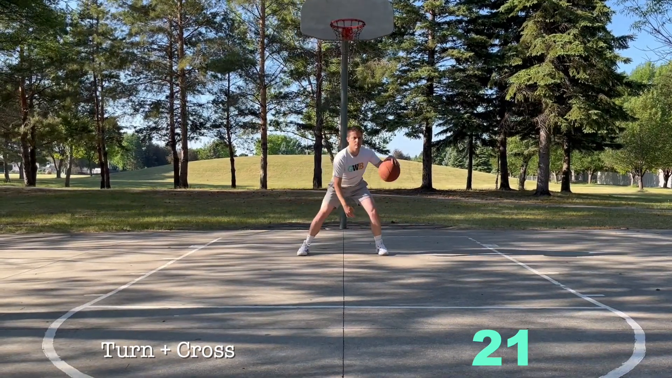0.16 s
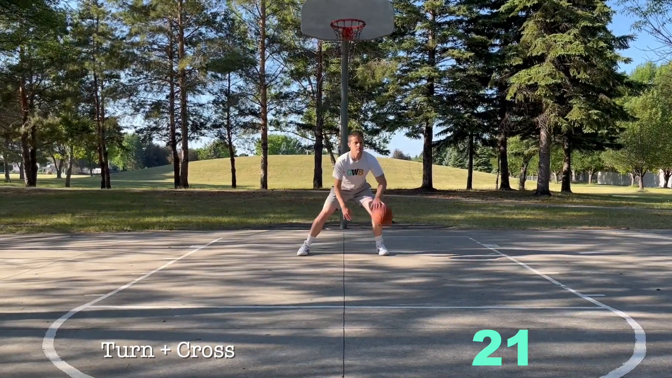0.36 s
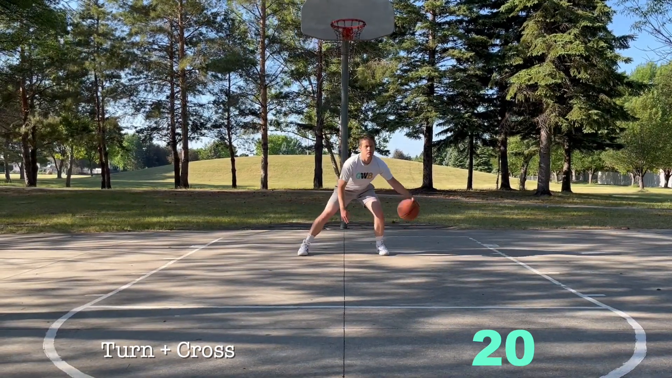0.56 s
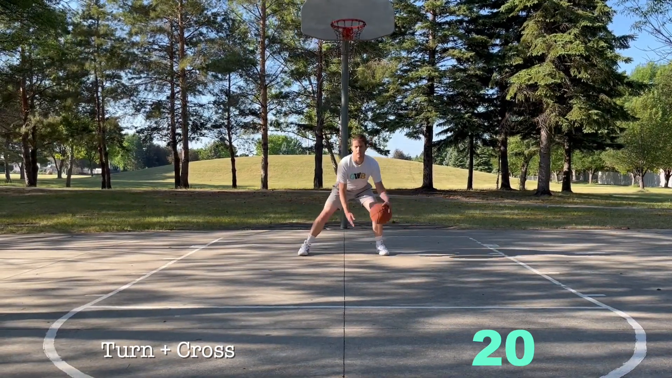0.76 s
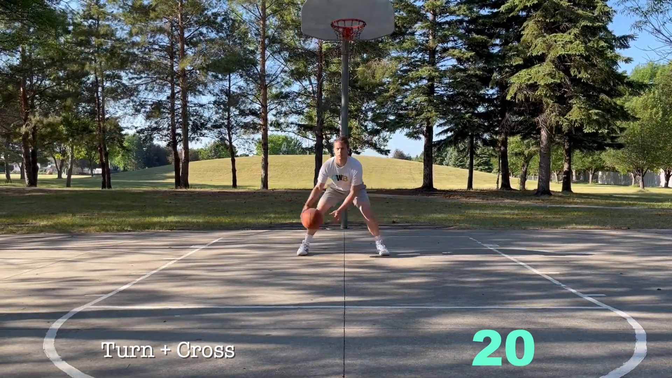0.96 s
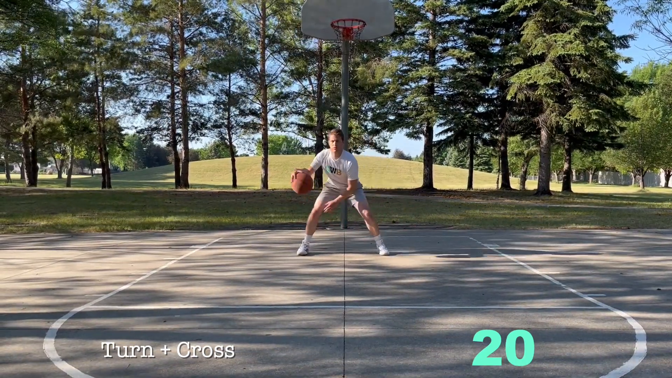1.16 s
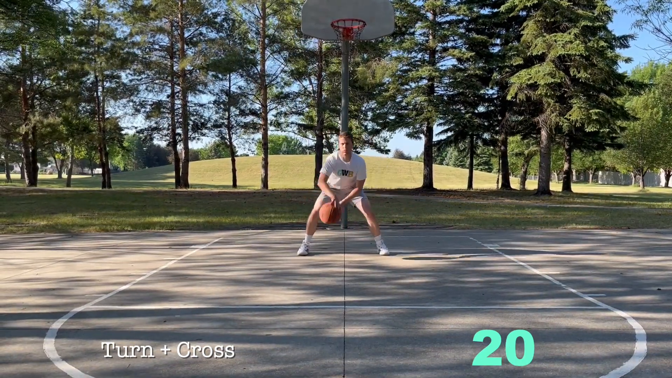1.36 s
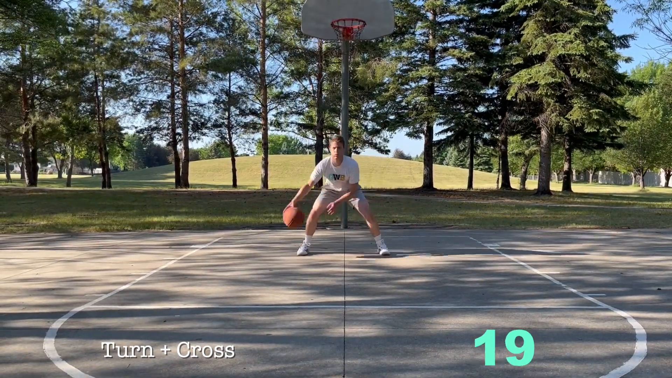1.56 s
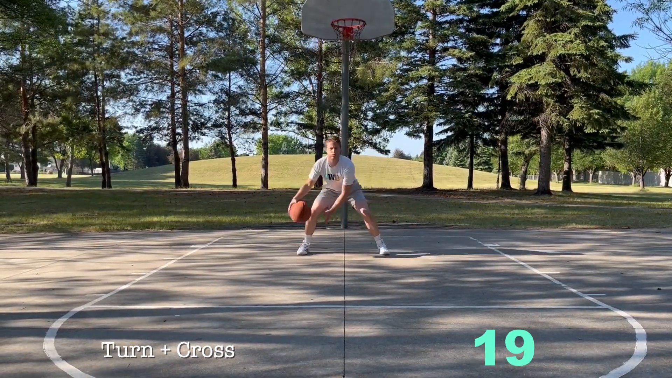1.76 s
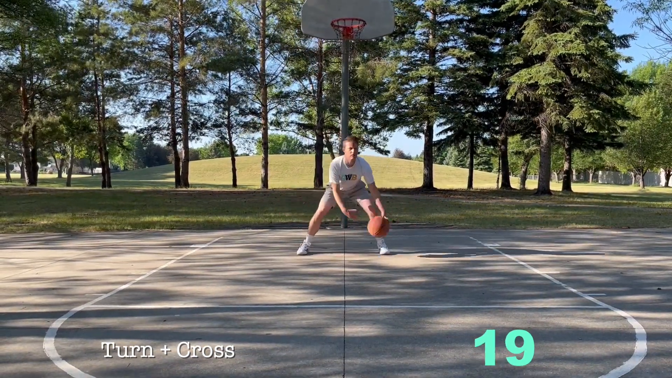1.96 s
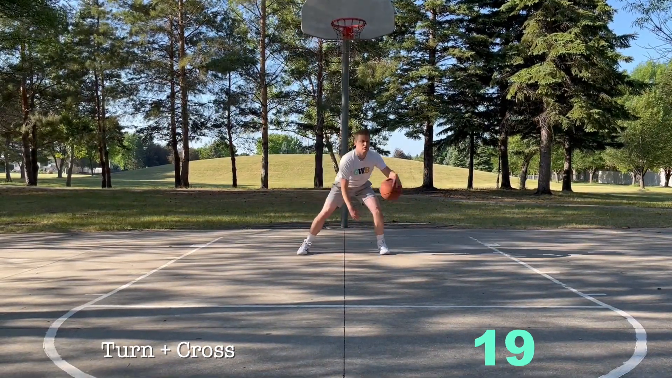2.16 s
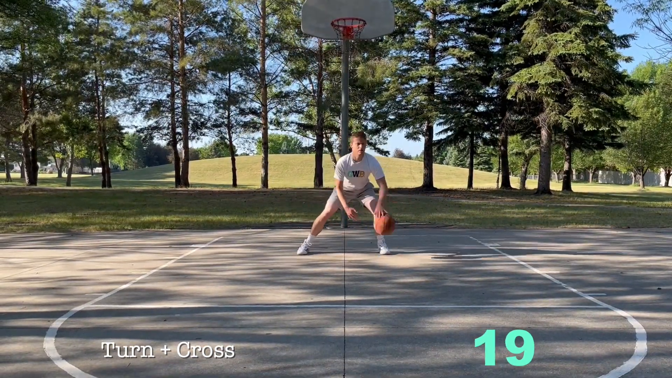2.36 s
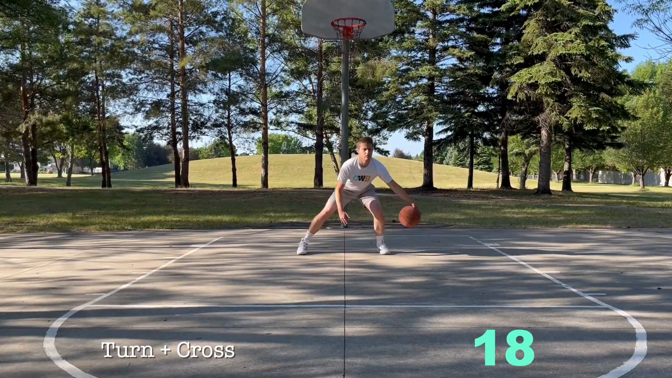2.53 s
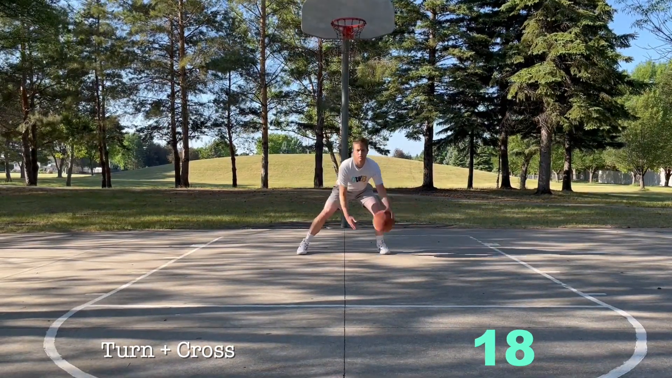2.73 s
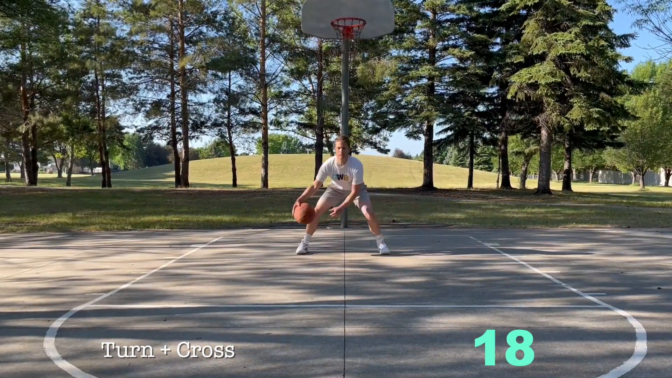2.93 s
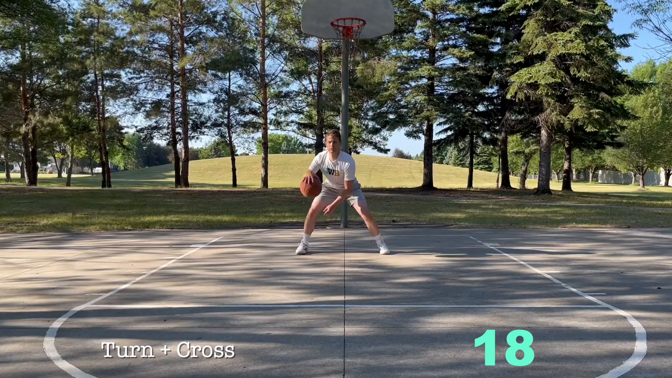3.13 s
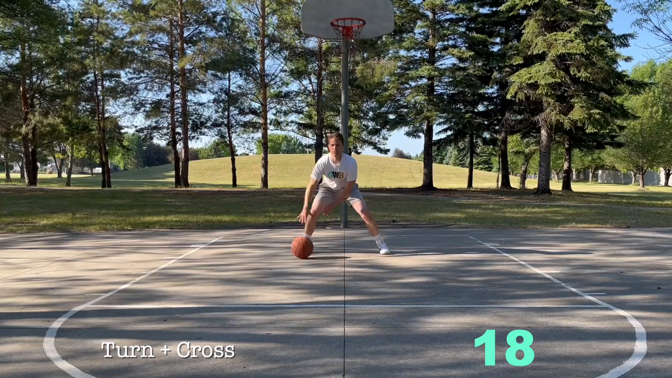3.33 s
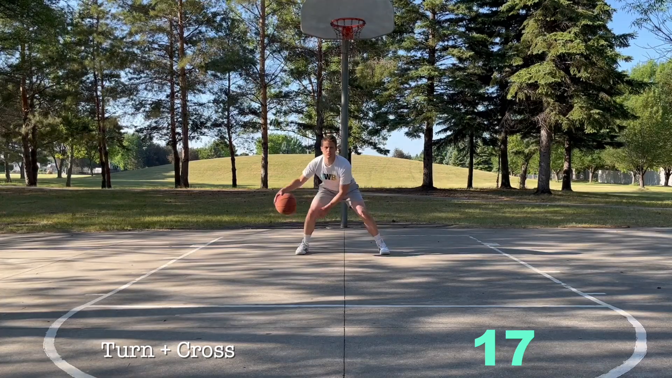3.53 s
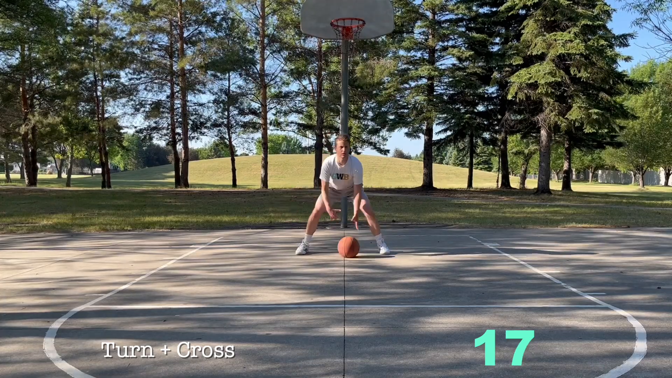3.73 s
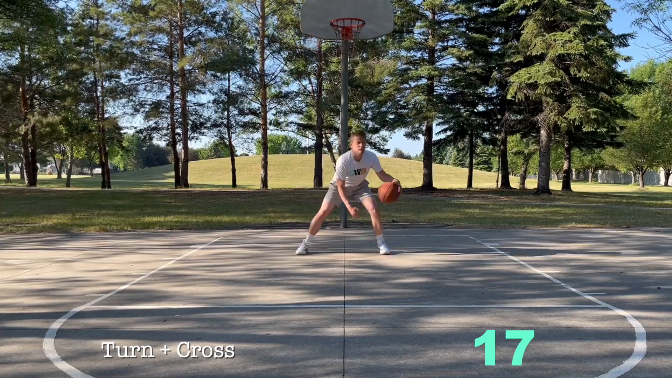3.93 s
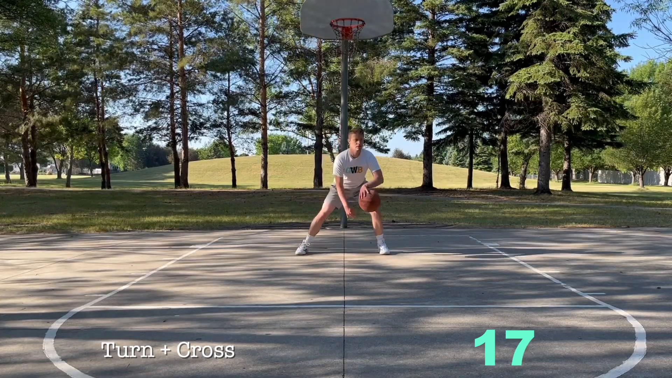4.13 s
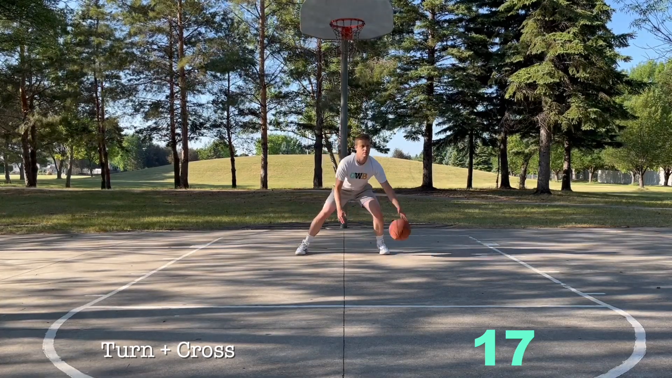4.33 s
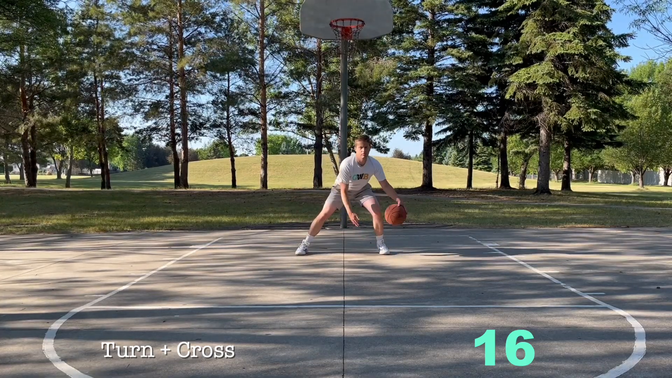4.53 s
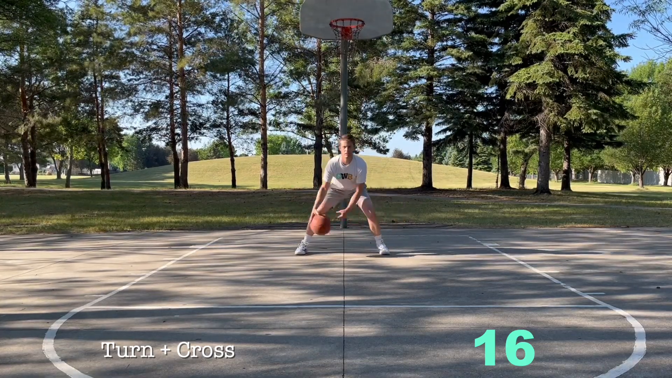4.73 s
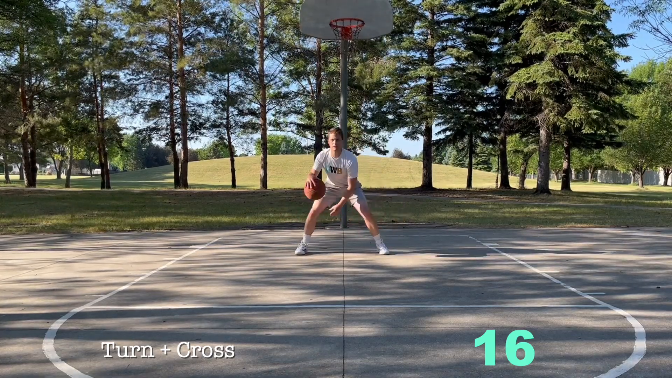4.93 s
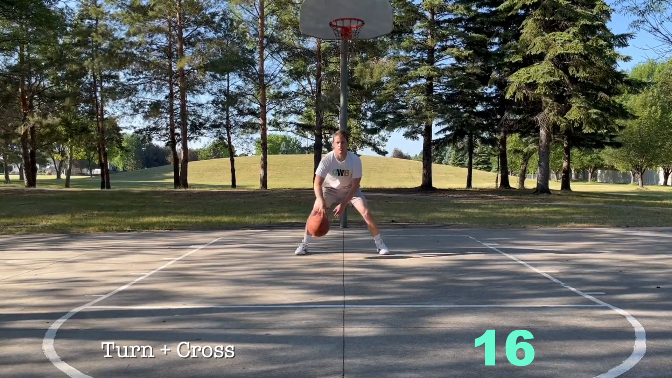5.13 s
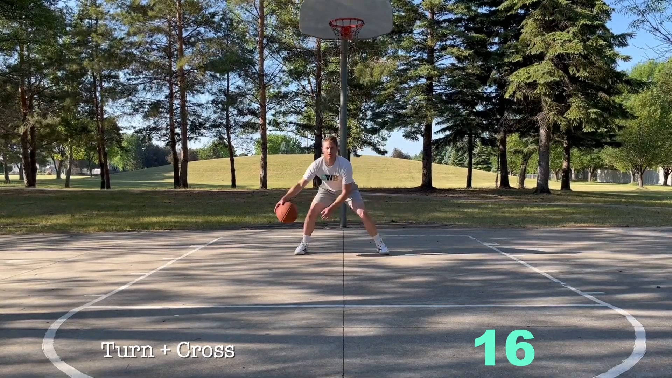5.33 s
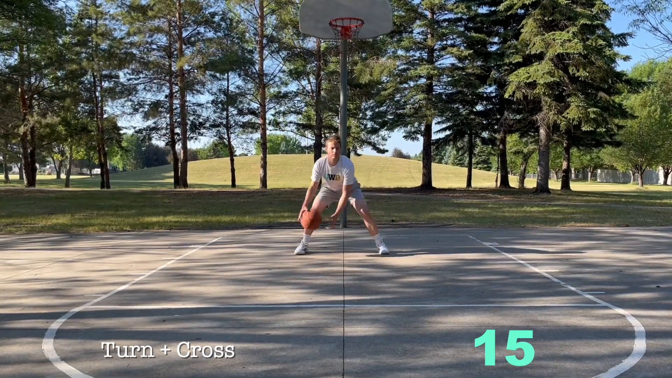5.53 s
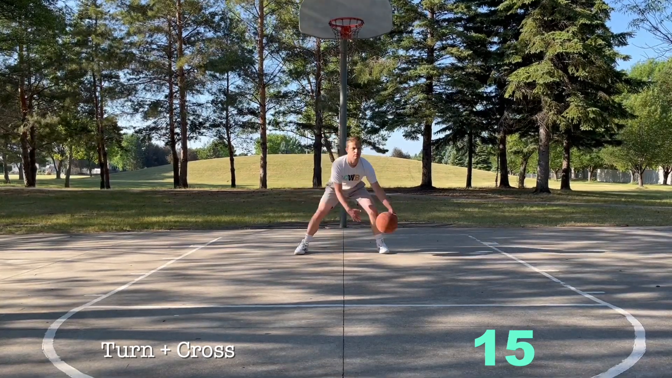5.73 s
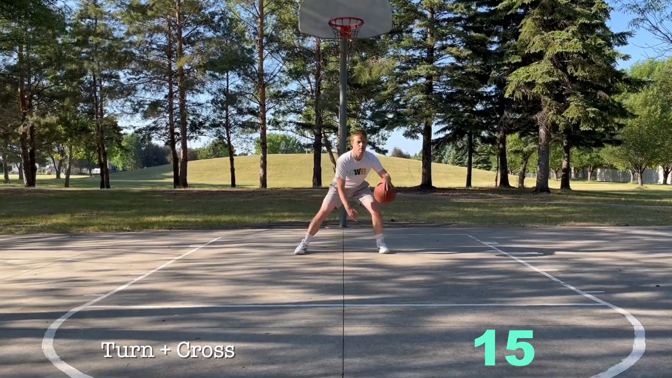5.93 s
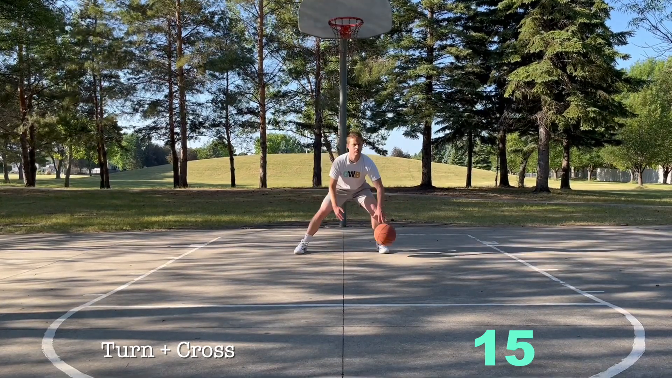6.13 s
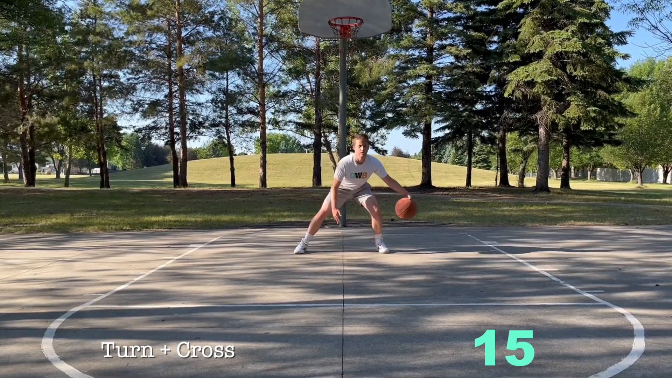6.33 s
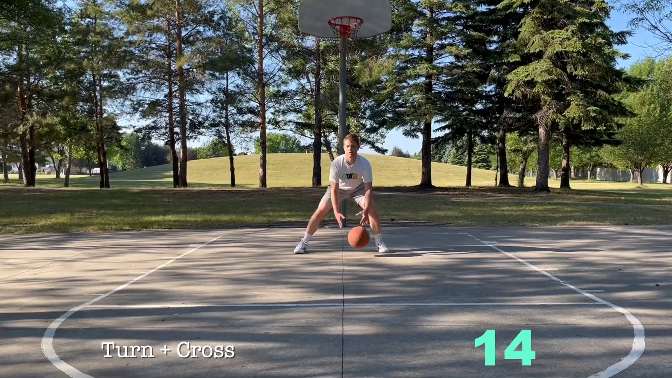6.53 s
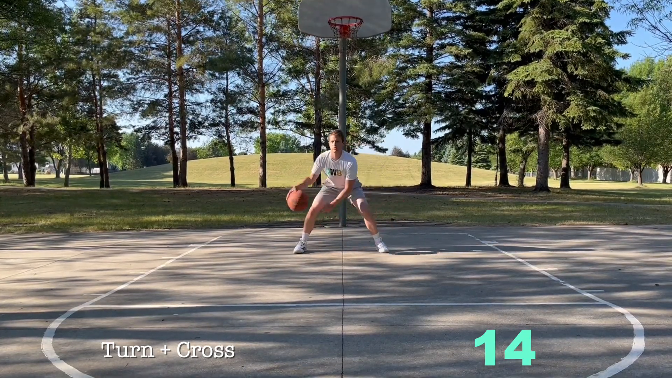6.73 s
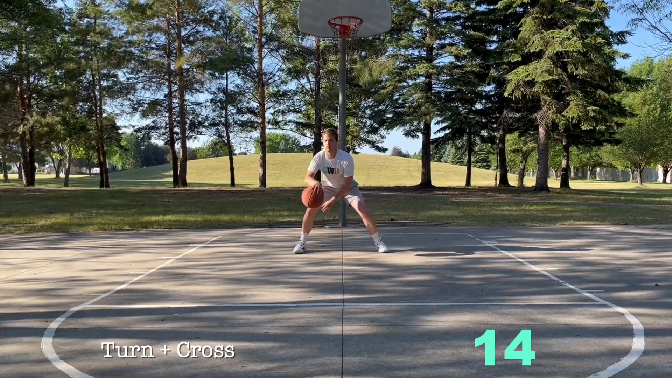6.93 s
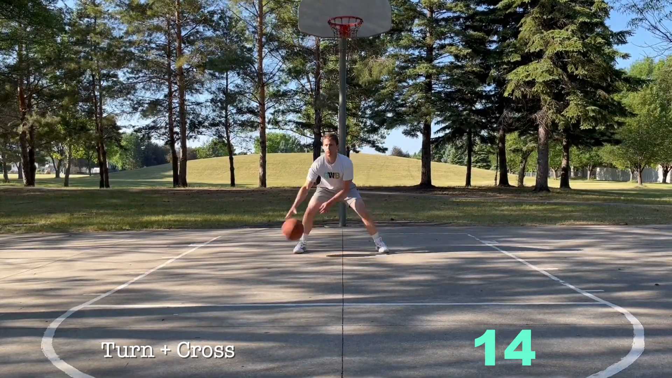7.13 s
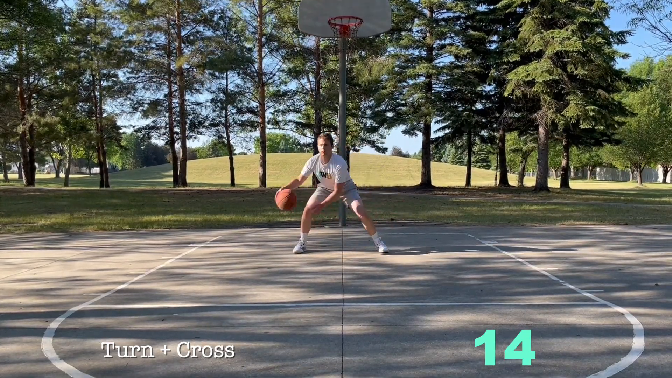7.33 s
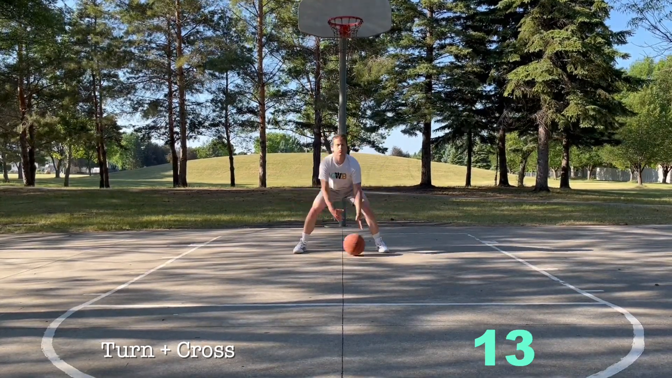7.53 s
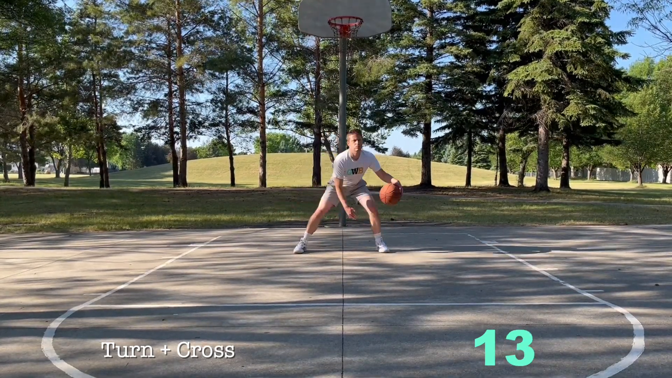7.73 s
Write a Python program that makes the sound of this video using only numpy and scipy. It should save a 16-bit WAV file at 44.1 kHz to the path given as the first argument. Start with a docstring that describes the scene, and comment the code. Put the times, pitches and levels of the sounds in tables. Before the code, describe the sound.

A single basketball is pounded on an outdoor concrete court a few metres from the microphone. Each bounce is a bright, gritty slap with a short hollow rubber ping and low thump, then a faint echo from the backboard and trees. Bounces come roughly twice a second, alternating shorter and longer gaps. Wind rumbles and pops on the microphone, strongest midway, over a soft steady hiss of leaves.

```python
"""Outdoor court on a breezy day: a basketball is dribbled hard a few metres from the microphone.
Each bounce sums a slap pulse on concrete, crushed grit, the ringing shell, a low thump and a lift-off.
The backboard and trees answer by convolution with a faint echo and decaying noise.
Leaves hiss as steady coloured noise; wind is rumble, flutter and single pops on the microphone."""
import sys
import numpy as np
from scipy import signal
from scipy.fft import rfft, irfft, next_fast_len
from scipy.io import wavfile
from scipy.ndimage import map_coordinates

SR = 44100
rng = np.random.default_rng(int(sys.argv[2]) if len(sys.argv) > 2 else 0)


def store_wav(level_fs):
    """Save 16-bit WAV to argv[1]."""
    pcm = np.round(np.clip(np.atleast_2d(level_fs), -1, 1) * 32767)
    wavfile.write(sys.argv[1], SR, pcm.T.astype(np.int16))


N = 347508

# Bounces; levels are before each layer's trim: (time [s], slap level [dB], slap centre [Hz],
#  panel resonance over slap [dB], panel pitch [Hz], panel width [Hz], crack: slap treble boost [dB],
#  grit level [dB], shiver over slap [dB], ping level [dB], ping pitch [Hz], ping t60 [s],
#  ping over other modes [dB], lift-off level [dB], thump level [dB])
BOUNCES = [(0.4866, -21.5, 2780, 5, 2800, 520, 3.5, -30, -12, -30, 970, 0.024, -1.5, -44, -26),
           (0.906, -20, 2370, 2, 2060, 330, 0, -24, -10.5, -35, 790, .022, 0, -39.5, -21),
           (1.5017, -22.5, 2520, -8, 3400, 650, 3, -46, -12, -29, 983, 0.024, -0.5, -34.5, -21),
           (1.93, -26, 2600, -16, 3500, 1800, 0, -31, -7.5, -41, 1030, .018, 1, -45, -29.5),
           (2.469, -20, 2750, 3, 3230, 650, 3.5, -32, -14.5, -22.5, 1072, 0.029, 10.5, -39, -20),
           (2.8529, -23, 1950, -3, 2400, 900, -1, -53, -9.5, -32, 920, 0.024, 1, -36, -20),
           (3.377, -25.5, 2300, 15, 5900, 1500, 5, -14.5, -7, -24.5, 1005, 0.02, -2, -31.5, -17),
           (3.7668, -20, 2350, -2, 2770, 1100, -11, -59, -10.5, -27, 1226, 0.016, 6.5, -32.5, -18.5),
           (4.3137, -27, 2820, 21, 3440, 650, 10, -38, -7.5, -26, 1068, 0.033, 2.5, -34.5, -21),
           (4.6891, -20, 2650, -3, 3370, 650, -21, -24, -4, -41, 980, 0.039, 1, -37.5, -19.5),
           (5.2349, -23.5, 3150, 1, 3360, 650, 4.5, -25.5, -6, -30.5, 1096, 0.021, -1, -48, -42),
           (5.6738, -21.5, 2260, 2, 2420, 800, 0, -40, -6.5, -30.5, 1070, .022, -2.5, -40.5, -38.5),
           (6.208, -21, 2680, 8, 3300, 1200, 3.5, -32, -19, -25, 1050, 0.01, 9.5, -42.5, -35),
           (6.5996, -24, 2030, 7, 3240, 650, -5, -36, -6, -22.5, 1100, 0.013, 3.5, -36.5, -22.5),
           (7.1191, -23, 2480, 14, 3230, 650, 2, -34, -7.5, -23.5, 985, 0.018, 0.5, -27, -32),
           (7.5622, -26, 2250, 8, 5100, 2420, -12, -24, -6, -27, 974, 0.031, -2.5, -32, -35)]
# Ball modes with the ping at PING_HZ: (pitch [Hz], level [dB], t60 [s])
BALL_MODES = [(376, -17, 0.128), (454, -30, 0.084), (687, -7.5, 0.051), (866, -0.5, 0.038),
              (1118, 8.5, 0.019), (1302, -3.5, 0.05), (1720, -3.5, 0.021), (1885, -5.5, 0.042),
              (2260, -31, 0.04), (2660, -8.5, .022)]
PING_HZ = 1070
# Spectra of the contact layers: (frequency [Hz], relative density [dB])
SLAP_SPECTRUM = [(60, -35), (400, -3.5), (900, -5), (1500, 3), (2000, 11), (3100, 5.5), (4200, 2),
                 (6000, -11), (10000, -8), (13000, -18.5), (16000, -50)]
GRIT_SPECTRUM = [(1500, -25), (3200, -9), (4200, 0), (5200, 2), (6700, 1), (7600, -7), (9000, -19),
                 (11000, -28), (16000, -48)]
SHELL_SPECTRUM = [(40, -40), (120, -10), (250, -4), (450, 3.5), (750, 3), (1150, 8.5), (1500, -14.5),
                  (2200, -2), (3200, -2.5), (5000, -15), (9000, -22), (16000, -51)]
# Rubber peeling off concrete: (frequency [Hz], relative density [dB])
SCUFF_SPECTRUM = [(300, -12), (1000, 1), (1600, 4), (2600, -8), (4200, -14.5), (7000, -25), (16000, -50)]
# Rough part of the thump: (frequency [Hz], relative density [dB])
THUD_SPECTRUM = [(70, -66), (140, 5.5), (200, 4.5), (280, -7.5), (370, -2), (520, -9.5), (800, -16.5),
                 (2000, -21.5), (12000, -61.5), (16000, -82)]
# Air inside the ball: (pitch [Hz], level over slap [dB], t60 [s])
AIR_MODES = [(985, -32, 0.24), (2130, -44, 1.7), (2780, -48, .35)]
CRACK_HZ = 7500  # corner of the slap's treble boost
BUCKLE_S, BUCKLE_HZ, BUCKLE_DB = 0.00548, 260, -6.5  # delay, mean pitch, level over shell motion
# Stereo width of the ball: (frequency [Hz], side over mid [dB])
BALL_WIDTH = [(100, -14.5), (600, -21), (1100, -15.5), (1550, -6), (2000, -16), (2900, -7), (5000, -9),
              (7000, 0), (8500, 3), (10000, -3), (13000, 40), (15500, -19)]
# Scatter from the backboard's pole and nearest trunks: (delay [s], spread [s], level [dB])
TRUNKS = [(.0285, 0.0014, -29), (0.039, 0.0041, -27), (.049, .004, -30), (.05, .03, -31)]
# Decay of the trees' answer: (frequency [Hz], t60 [s])
TREES_T60 = [(200, 1), (1000, 1), (3000, 0.92), (8000, 0.74)]
BOARD_S, BOARD_SPREAD_S = 0.039, 0.0006  # backboard echo: mean delay, random spread
# Strong eddies on the microphone; peak is before the pop trim:
#  (time [s], peak level [dB], centre [Hz], flutter over peak [dB])
PUFFS = [(0.004, -28.5, 155, -6), (0.09, -33, 149, -8), (0.16, -29.5, 119, -13), (0.185, -25.5, 141, -3),
         (0.221, -29.5, 176, -4.5), (0.255, -26.5, 272, -20), (0.587, -35, 370, -21), (0.6, -39, 390, -14),
         (0.961, -36.5, 125, -8), (1.185, -26.5, 125, -12.5), (1.806, -27, 145, -19.5),
         (1.89, -25, 81, -33), (2.374, -30, 85, -18), (2.545, -25, 90, -14.5), (2.651, -21.5, 73.6, -24),
         (2.769, -25, 75, -21), (3.083, -17, 80, -31), (3.125, -25, 74.6, -21), (3.242, -31, 75, -22),
         (3.657, -24.5, 87, -27), (4.112, -15, 117, -13.5), (4.236, -26, 130, -12), (4.263, -19.5, 94, -25),
         (4.43, -16.5, 75.4, -12.5), (4.471, -22.5, 85, -17), (4.566, -22.5, 96, -30),
         (4.79, -29.5, 115, -13), (5.089, -34, 168, -1), (5.119, -20.5, 215, -8.5),
         (5.717, -19.5, 230, -13.5), (5.767, -32.5, 256, -2), (5.875, -38.5, 223, 6), (5.923, -40, 220, 0),
         (6.845, -37, 137, -3), (6.88, -27, 177, -13), (6.963, -37, 153, -4), (7.042, -31, 208, -0.5),
         (7.499, -30, 169, -8.5)]
# Wind course: (time [s], strength at the microphone [dB], flutter level [dB])
WIND = [(0.0, -45, -42.5), (0.42, -51, -45.5), (0.67, -63, -53), (0.86, -60, -48.5), (1.0, -39.5, -42),
        (1.33, -47.5, -48.5), (1.62, -39, -43), (1.9, -35, -41), (2.14, -42, -44.5), (2.56, -29, -38.5),
        (2.71, -35, -45.5), (2.84, -29, -40), (3.02, -38, -45.5), (3.14, -29.5, -39), (3.45, -31, -42.5),
        (3.7, -31, -48.5), (3.83, -34.5, -42), (3.9, -29.5, -42), (3.99, -36.5, -53), (4.13, -26.5, -43.5),
        (4.2, -32.5, -49), (4.28, -29.5, -35.5), (4.38, -33, -41.5), (4.47, -25, -37), (4.66, -32.5, -44),
        (4.76, -33, -40.5), (4.86, -38.5, -42), (4.98, -37.5, -42.5), (5.11, -32, -39.5), (5.2, -58, -49.5),
        (5.49, -46, -42.5), (5.6, -55, -49), (5.7, -45, -42), (5.85, -65, -56), (6.12, -68, -61.5),
        (6.55, -52, -50), (6.7, -35, -43), (6.8, -43, -43.5), (7.05, -47, -41), (7.25, -55, -57.5),
        (7.48, -41, -41.5), (7.7, -54, -50.5), (7.86, -45, -49)]
# Wind noise spectra: (frequency [Hz], relative density [dB])
RUMBLE_SPECTRUM = [(15, -20), (28, -13.5), (45, 2), (65, 6), (100, -6), (140, -9.5), (220, -50), (500, -78)]
FLUTTER_SPECTRUM = [(25, -49), (50, -54), (75, 0), (120, 2), (210, -3.5), (300, -18), (450, -25),
                    (800, -45), (2000, -58)]
GUST_DB = -28  # wind strength of a full gust
RUMBLE_DB, RUMBLE_DB_PER_DB = -28.5, 1.62  # level in a full gust, change with wind strength
EDDIES_PER_S = 5
# Small eddies: pitch in a full gust, peak over wind strength before the pop trim, scatter, flutter
EDDY_HZ, EDDY_DB, EDDY_SCATTER_DB, EDDY_FLUTTER_DB = 91, -2.5, 0.5, -10
EDDY_OCTAVE_DB = 30  # fall in wind strength that raises eddy pitch one octave
EDDY_LOW_CUT_HZ = 48.3
# Leaf hiss: (frequency [Hz], relative density [dB])
LEAVES_SPECTRUM = [(50, -60), (200, 15), (500, 7.5), (1100, 3), (1500, -0.5), (3000, -1), (4800, -2),
                   (7000, -10), (10000, -10.5), (13000, -9.5), (14000, -22), (15000, -33), (16000, -48)]
# Stereo width of the leaves: (frequency [Hz], side over mid [dB])
LEAVES_WIDTH = [(200, -6), (500, 0.5), (1000, 4), (1600, 7.5), (1850, -6), (2400, -4), (3200, -2),
                (5500, -3), (8000, 4), (10500, 0.5), (15000, 9)]
LEAVES_DB = -52
# Treble dips in mid and side: (frequency [Hz], gain [dB])
MID_DIP = [(7100, 0.5), (7700, -9.5), (8400, -35), (9100, -10), (9800, -2.5)]
SIDE_DIP = [(9800, -1), (11000, -24), (12200, -64), (13500, -30), (14500, 3)]
TOP_HZ = 15700  # band limit


def amp(db):
    """Decibels to amplitude."""
    return 10 ** (np.asarray(db) / 20)


def unit(x):
    """x scaled to rms 1."""
    return x / np.sqrt(np.mean(x ** 2) + 1e-20)


def burst(x, seconds):
    """x scaled to the energy of an rms-1 signal of this length."""
    return x / np.sqrt(np.sum(x ** 2) / (seconds * SR) + 1e-20)


def along(points, hz):
    """Interpolate (frequency [Hz], value) points on a log frequency axis."""
    f, v = np.transpose(points)
    return np.interp(np.log(hz + 1), np.log(f + 1), v)


def curves(rows):
    """One value per sample for each column after the time."""
    s, *cols = np.transpose(rows)
    return [np.interp(np.arange(N) / SR, s, c) for c in cols]


def wobble(knots_per_s):
    """Smooth random curve."""
    knots = rng.standard_normal(int(N * knots_per_s / SR) + 4)
    return map_coordinates(knots, [np.arange(N) * knots_per_s / SR])


def filtered(x, response):
    """x times a (possibly complex) response of frequency."""
    n = x.shape[-1]
    m = next_fast_len(n + 4096)
    return irfft(rfft(x, m) * response(np.fft.rfftfreq(m, 1 / SR)), m)[..., :n]


def noise(spectrum, size):
    """Coloured noise of rms 1."""
    return unit(filtered(rng.standard_normal(size), lambda hz: amp(along(spectrum, hz))))


def pulse(spectrum, stretch, size):
    """Minimum-phase pulse with this spectrum, stretched in frequency."""
    hz = np.fft.rfftfreq(size, 1 / SR) / stretch
    cepstrum = irfft(np.log(amp(along(spectrum, hz))))
    cepstrum[1:size // 2] *= 2
    cepstrum[size // 2 + 1:] = 0
    return irfft(np.exp(rfft(cepstrum)))


def add(track, s, x):
    """Mix x into the track from time s."""
    part = track[..., max(round(s * SR), 0):][..., :x.shape[-1]]
    part += x[..., :part.shape[-1]]


def dribble():
    """All bounces, air rings and echoes, with a phase-shifted copy in the side: (mid, side)."""
    direct, echoes = np.zeros(N), np.zeros((2, N))
    for s, slap_db, *blow in BOUNCES:
        hit, touch = bounce(slap_db, *blow), first_touch(slap_db)
        add(direct, s, hit)
        add(direct, s - len(touch) / SR, touch)
        add(echoes, s, surroundings(hit, board_db=-28, trees_db=-21))
        add(direct, s, air_ring(slap_db))
    phase_rad = [(150, 0.92), (2000, 2.17), (4500, 2.05), (9000, 1.64)]
    side = filtered(direct, lambda hz: amp(along(BALL_WIDTH, hz)) * np.exp(-1j * along(phase_rad, hz)))
    return np.array([direct, side]) + echoes


def bounce(slap_db, slap_hz, panel_db, panel_hz, panel_width_hz, crack_db, grit_db, shiver_db,
           ping_db, ping_hz, ping_t60_s, focus_db, lift_db, thump_db, size=4096):
    """One contact with the court, from slap to lift-off."""
    t = np.arange(size) / SR
    out = slap(slap_db, slap_hz, panel_db, panel_hz, panel_width_hz, crack_db, size)
    out += grit(grit_db, t)
    out += shell_shiver(slap_db + shiver_db, t)
    out += shell_ping(ping_db, ping_hz, ping_t60_s, focus_db, t)
    # a deeper squash moves more of the shell
    out += shell_buckle(slap_db + 0.2 * (thump_db + 22.0), t)
    out += thump(thump_db, focus_db, t)
    out += scuff(slap_db, t)
    add(out, 0.0089 + 0.00051 * rng.standard_normal(), lift_off(lift_db, ping_hz, focus_db, t))
    return out


def slap(slap_db, slap_hz, panel_db, panel_hz, panel_width_hz, crack_db, size):
    """Rubber meets concrete in a sharp pulse; the landing panel resonates; the inner air returns it twice."""
    def response(hz):
        panel = 1 + amp(panel_db) / (1 + 1j * (hz ** 2 - panel_hz ** 2) / (hz * panel_width_hz + 1))
        crack = amp(crack_db * (1 - 1 / (1 + (hz / CRACK_HZ) ** 8)))
        return panel * crack

    blow = filtered(pulse(SLAP_SPECTRUM, np.sqrt(slap_hz / 2600), size), response)
    blow = -amp(slap_db - 4.0) * burst(blow, 0.0054)
    out = blow.copy()
    trip_s = .00135 * (1 + .1 * rng.standard_normal())
    add(out, trip_s, amp(-15) * blow)
    add(out, 2 * trip_s, amp(-12.0) * blow)
    return out


def grit(grit_db, t):
    """Grit crushed under the spreading patch: decaying noise through a coloured pulse."""
    crush = rng.standard_normal(len(t)) * amp(-60 * t / 0.0066)
    crush = signal.fftconvolve(crush, pulse(GRIT_SPECTRUM, 1, len(t)))[:len(t)]
    return amp(grit_db - 9.5) * burst(crush, 0.0034)


def shell_shiver(level_db, t):
    """The shell shivers: noise with a quick rise and a two-stage decay."""
    decay = amp(-60 * t / .022) + .15 * amp(-60 * t / .055)
    rise = 1 - np.exp(-(t / .0014) ** 2)
    return amp(level_db) * burst(noise(SHELL_SPECTRUM, len(t)) * decay * rise, 0.0034)


def shell_ping(ping_db, ping_hz, ping_t60_s, focus_db, t):
    """The struck shell rings in its modes."""
    modes = ring(t, ping_hz, ping_t60_s, focus_db, scatter_db=3.5, detune=0.041)
    return -amp(ping_db - 0.5) * burst(modes * (1 - np.exp(-t / 0.00058)), 0.0058)


def ring(t, ping_hz, ping_t60_s, focus_db, scatter_db, detune):
    """Damped modes at random strengths; those near the ping follow its pitch and decay."""
    hz, db, t60_s = np.transpose(BALL_MODES)[:, :, None]
    strength, offset = rng.standard_normal((2, len(BALL_MODES), 1))
    near = np.exp(-(np.log(hz / PING_HZ) / 0.18) ** 2)
    # rubber damps any mode within a few dozen cycles
    t60_s = np.minimum(t60_s ** (1 - near) * ping_t60_s ** near, 42 / hz)
    chance = 1 - 1.17 * near
    hz = hz * (ping_hz / PING_HZ) ** near * (1 + detune * chance * offset)
    sign = np.where(near > .5, 1, rng.choice([-1, 1], size=hz.shape))
    # a square hit favours the modes near the ping
    level_db = db + focus_db * near + scatter_db * chance * strength
    return np.sum(sign * amp(level_db - 60 * t / t60_s) * np.sin(2 * np.pi * hz * t), 0)


def shell_buckle(body_db, t):
    """The shell buckles just after the slap: a brief low wave packet."""
    t = t - BUCKLE_S
    hz = BUCKLE_HZ * (1 + 0.17 * rng.standard_normal())
    return -amp(body_db + BUCKLE_DB) * np.exp(-(t / 0.0022) ** 2) * np.cos(2 * np.pi * hz * t)


def thump(thump_db, focus_db, t):
    """The squashed ball pumps a few slow cycles of air, with a rough thud above them."""
    swell = np.exp(-((t - .015) / 0.01) ** 2) * (1 - np.exp(-t / 0.0022))
    pump = -amp(thump_db - 8.5) * burst(swell * np.sin(2 * np.pi * 106 * t), 0.063)
    thud = noise(THUD_SPECTRUM, len(t)) * np.exp(-((t - .013) / 0.015) ** 2)
    return pump + amp(0.26 * thump_db - .5 * focus_db - 25.0) * burst(thud, 0.015)


def scuff(slap_db, t):
    """The flattened patch peels off the ground: a short swell of noise."""
    swell = np.exp(-((t - .012) / 0.0017) ** 2)
    return amp(slap_db - 16) * burst(noise(SCUFF_SPECTRUM, len(t)) * swell, 0.0032)


def lift_off(lift_db, ping_hz, focus_db, t):
    """The patch springs back: the modes ring again, softer in onset and duller."""
    spring = ring(t, ping_hz, 0.02, focus_db, scatter_db=3.0, detune=0.064)
    spring = spring * (1 - np.exp(-(t / 0.0023) ** 2))
    spring = filtered(spring, lambda hz: 1 / (1 + (hz / 1500) ** 4))
    return amp(lift_db + 0.5) * burst(spring, 0.012)


def first_touch(slap_db, size=128):
    """The pebbled skin brushes the ground just before the slap: rising noise."""
    rise = np.exp((np.arange(size) - size) / SR / .00055)
    return amp(slap_db - 5) * rise * noise(SLAP_SPECTRUM, size)


def air_ring(slap_db):
    """The air inside the ball rings on faintly: damped sines of random strength."""
    t = np.arange(SR // 2) / SR
    hz, db, t60_s = np.transpose(AIR_MODES)[:, :, None]
    level_db = slap_db + db + rng.normal(0, 2.5, hz.shape)
    return np.sum(amp(level_db - 60 * t / t60_s) * np.sin(2 * np.pi * hz * t), 0)


def surroundings(hit, board_db, trees_db):
    """Backboard echo, scatter from near trunks and the trees' decaying noise: (mid, side)."""
    hz, t, z = signal.stft(rng.standard_normal((2, SR // 2)), SR, nperseg=256)
    decay = amp(-60 * t / along(TREES_T60, hz)[:, None])
    tail = signal.istft(z * decay, SR, nperseg=256)[1]
    t = np.arange(tail.shape[1]) / SR
    trees = tail * (1 - np.exp(-(t / 0.01) ** 2))
    answer = amp(trees_db) * trees / np.linalg.norm(trees[0])
    for delay_s, spread_s, db in TRUNKS:
        # a few trunks return most of the sound, so the scatter is grainy
        near = rng.standard_normal(tail.shape) * np.exp(1.5 * rng.standard_normal(len(t)))
        near = near * np.exp(-((t - delay_s) / spread_s) ** 2)
        answer += amp(db) * near / np.linalg.norm(near[0])
    answer[1] *= amp(-1.0)
    board_s = BOARD_S + BOARD_SPREAD_S * rng.standard_normal()
    add(answer[0], board_s, amp(board_db) * np.ones(1))
    # trunks and board are too small to return much bass
    returned_db = [(100, -9), (400, 0), (1100, -4.5), (1800, 1), (2400, -1.5), (3300, -1),
                   (4500, 1.5), (6000, -1), (8000, -2)]
    thin = filtered(hit, lambda f: amp(along(returned_db, f)))
    return signal.fftconvolve(thin[None], answer, axes=1)


def puffs(size=8192):
    """Single eddies pop dully on the microphone and leave a short flutter: (mid, side)."""
    out, t = np.zeros((2, N)), np.arange(size) / SR
    wake = [(50, -41), (130, -16), (220, 5.0), (330, -10.5), (430, -16.5), (600, -31.0), (2000, -81)]
    for s, db, hz, wake_db in PUFFS + small_eddies():
        turns = (t - .0105) * hz
        # the pressure dips to a narrow point as the eddy passes
        dip = np.exp(-np.sqrt(turns ** 2 + 0.037) / 0.45)
        pop = -np.cos(2 * np.pi * turns) * dip * (1 - np.exp(-t / 0.0016))
        churn = np.array([noise(wake, size), amp(-4.5) * noise(wake, size)])
        churn = churn * (1 - np.exp(-t / 0.0036)) * amp(-60 * t / 0.13)
        add(out, s, amp(db + 4.5) * np.outer([1, .25], pop) + amp(db + wake_db + 1.5) * churn)
    return filtered(out, lambda hz: 1 - 1 / (1 + (hz / EDDY_LOW_CUT_HZ) ** 4))


def small_eddies():
    """Random eddies, harder and deeper in stronger wind: rows like those of PUFFS."""
    count = int(EDDIES_PER_S * N / SR)
    when, strength, pitch = rng.uniform(-1, 1, (count, 3)).T
    s = (np.arange(count) + .5 + when / 2) / EDDIES_PER_S
    wind_db = np.interp(s, *np.transpose(WIND)[:2])
    hz = EDDY_HZ * 2 ** (pitch / 2 + (GUST_DB - wind_db) / EDDY_OCTAVE_DB)
    peak_db = wind_db + EDDY_DB + EDDY_SCATTER_DB * strength
    return list(zip(s, peak_db, hz, np.full(count, EDDY_FLUTTER_DB)))


def wind():
    """Wind strength drives a deep rumble; a lighter flutter rides above it: (mid, side)."""
    strength_db, flutter_db = curves(WIND)
    eddies = wobble(22)  # quick swells shared by both
    rumble_db = RUMBLE_DB + RUMBLE_DB_PER_DB * (strength_db - GUST_DB) + 2.3 * eddies
    rumble = np.array([noise(RUMBLE_SPECTRUM, N), amp(-7.5) * noise(RUMBLE_SPECTRUM, N)])
    flutter_db = flutter_db + 2.84 * eddies + 2.5 * wobble(35)
    flutter = np.array([noise(FLUTTER_SPECTRUM, N), amp(-3.5) * noise(FLUTTER_SPECTRUM, N)])
    # low cut on the flutter, the same in all wind; the deep bass is left to the rumble
    flutter = filtered(amp(flutter_db) * flutter, lambda hz: 1 - 1 / (1 + (hz / 55) ** 6))
    return amp(rumble_db) * rumble + flutter


def leaves():
    """Steady, wide hiss of the trees: coloured noise, barely wavering: (mid, side)."""
    side = filtered(noise(LEAVES_SPECTRUM, N), lambda hz: amp(along(LEAVES_WIDTH, hz)))
    return amp(LEAVES_DB + 0.33 * wobble(5.0)) * np.array([noise(LEAVES_SPECTRUM, N), side])


def scene():
    """Ball, wind and trees, as left and right."""
    mid, side = dribble() + puffs() + wind() + leaves()
    # the left port is the more sensitive: (frequency [Hz], share of mid added to side)
    lean = [(50, 0.0), (150, 0.0), (450, 0.19), (1200, 0.1), (4000, 0.39), (9000, 0.25)]
    side = side + filtered(mid, lambda hz: along(lean, hz))
    return np.array([mid + side, mid - side])


def record(dry):
    """Stereo output: treble dips in mid and side, and a band limit."""
    mid = filtered((dry[0] + dry[1]) / 2, lambda hz: amp(along(MID_DIP, hz)))
    side = filtered((dry[0] - dry[1]) / 2, lambda hz: amp(along(SIDE_DIP, hz)))
    stereo = np.array([mid + side, mid - side])
    return filtered(stereo, lambda hz: np.clip((TOP_HZ - hz) / 1000 + .5, 0, 1))


dry = scene()
out = record(dry)
store_wav(out)
```